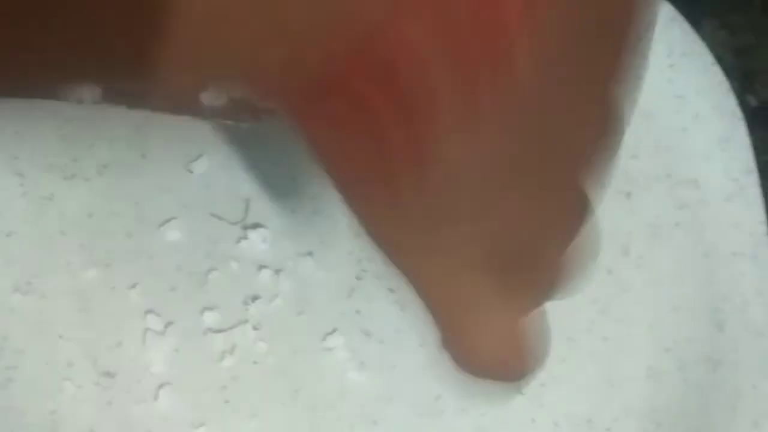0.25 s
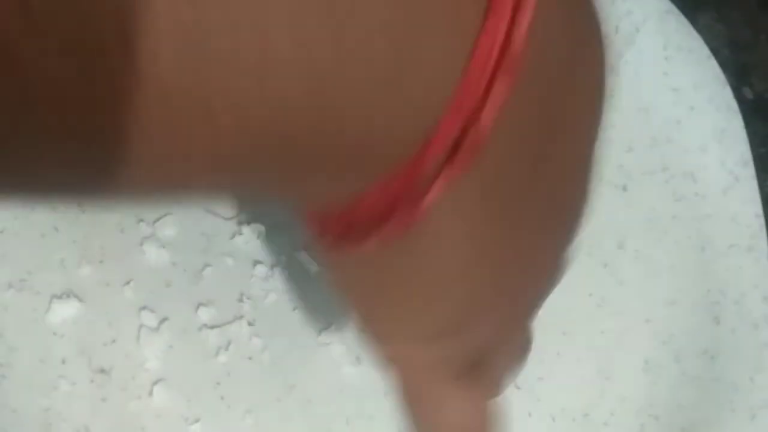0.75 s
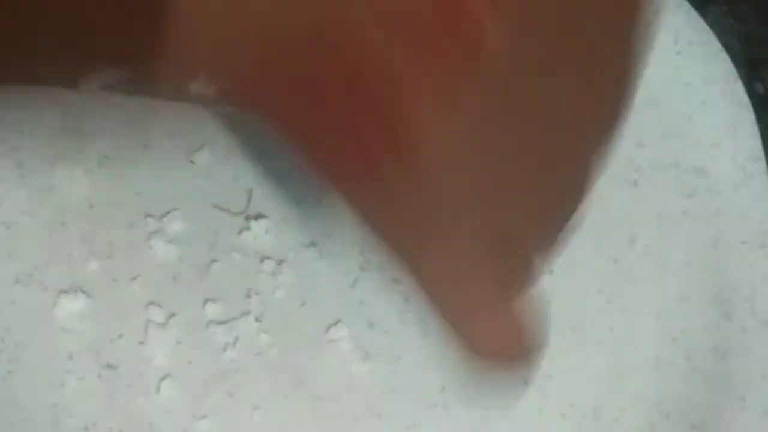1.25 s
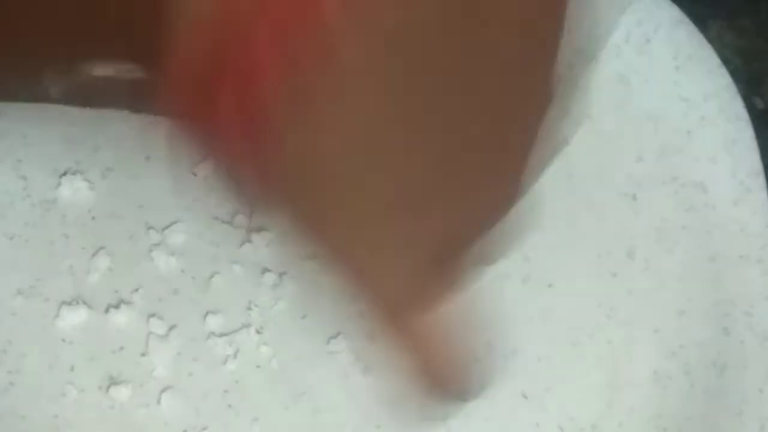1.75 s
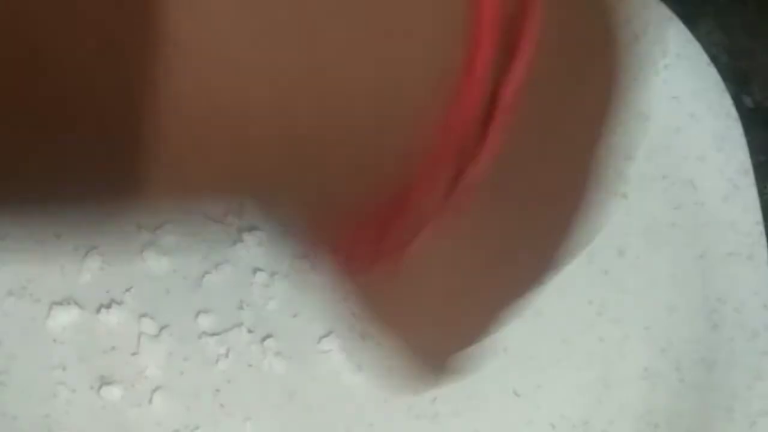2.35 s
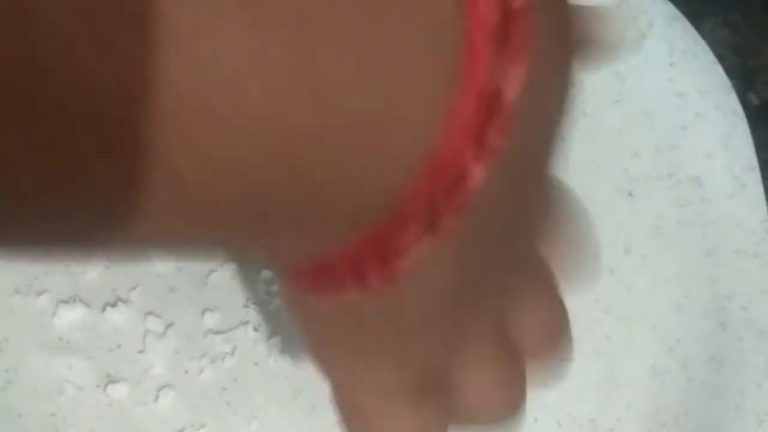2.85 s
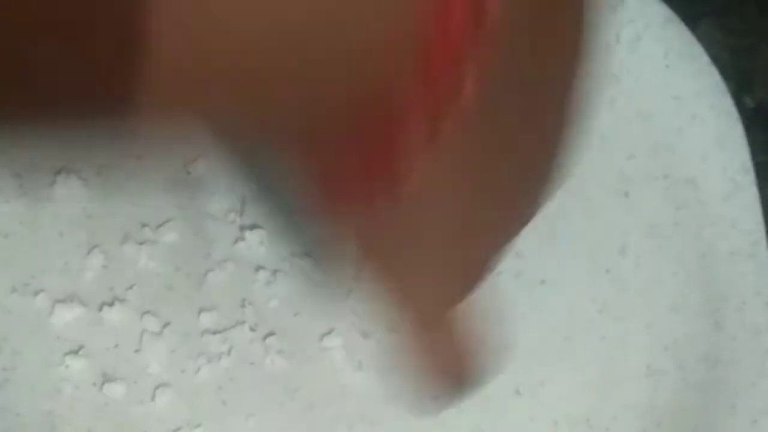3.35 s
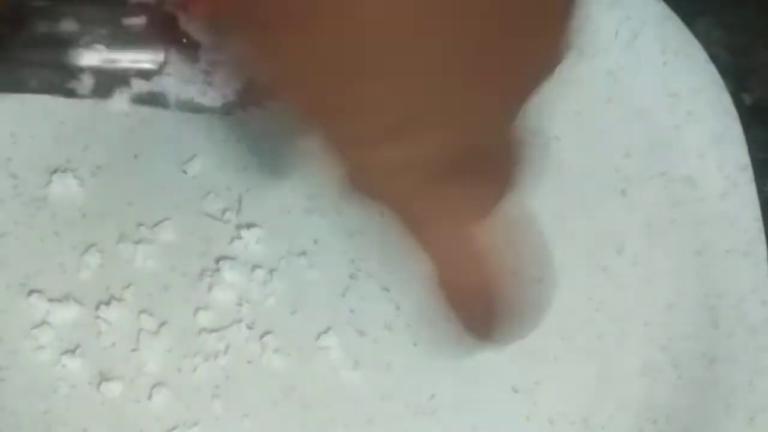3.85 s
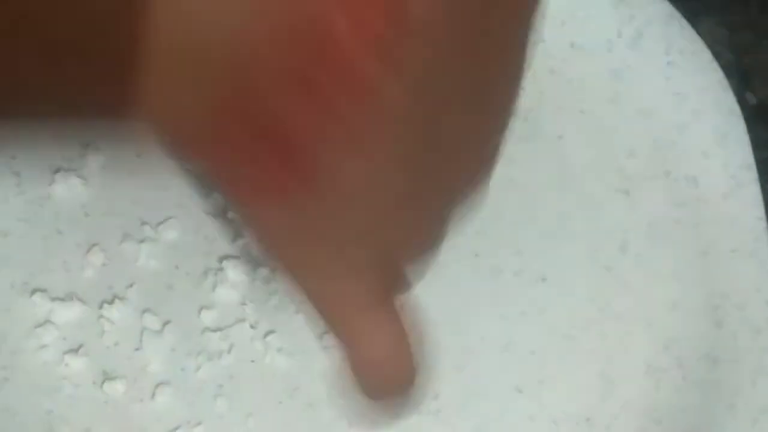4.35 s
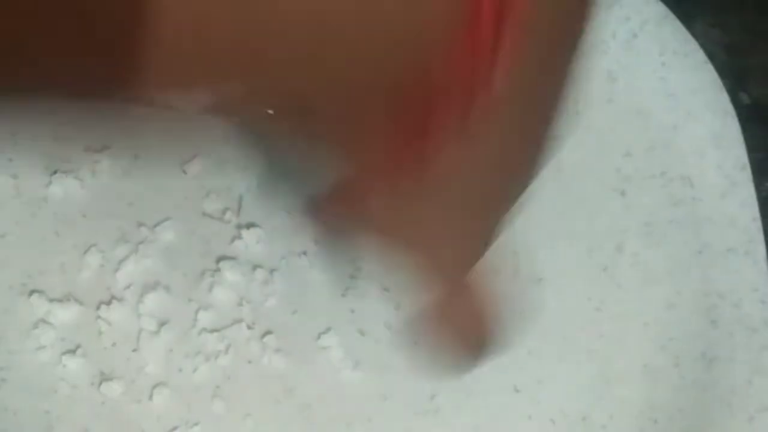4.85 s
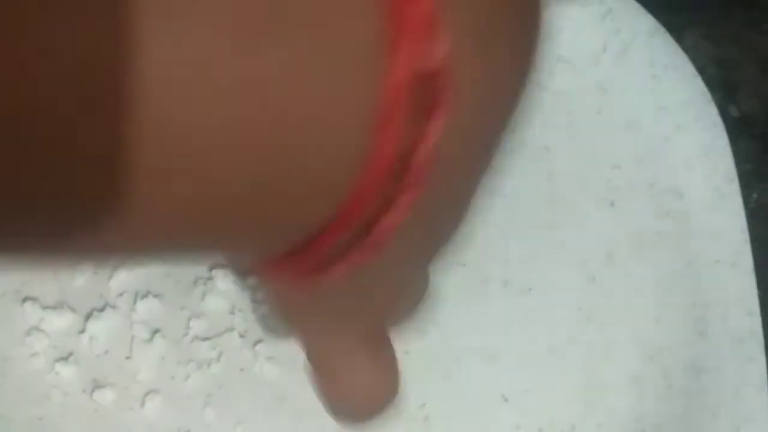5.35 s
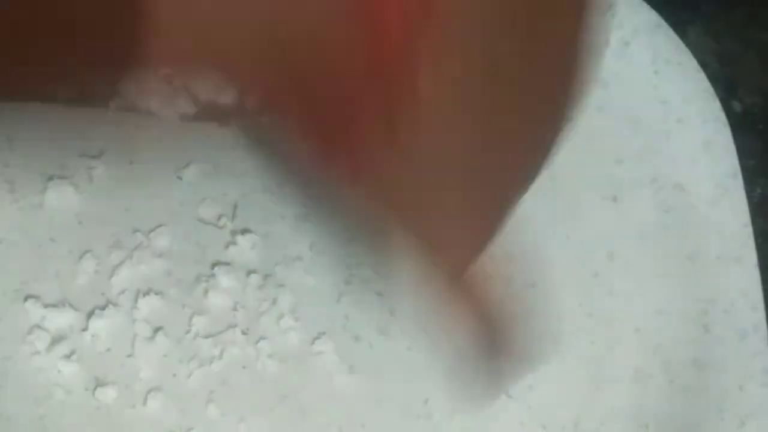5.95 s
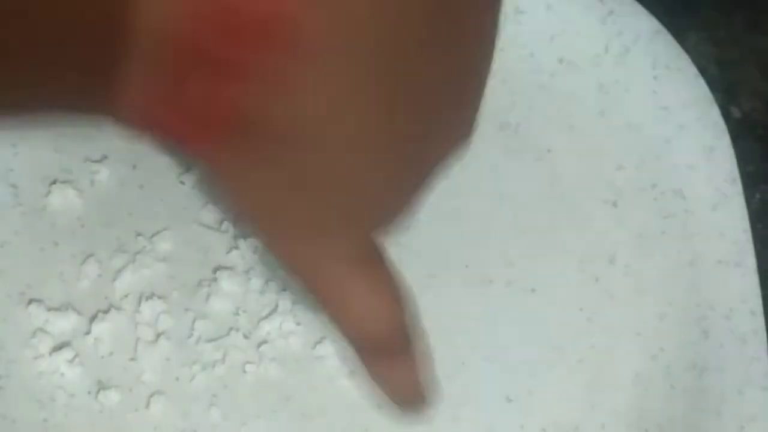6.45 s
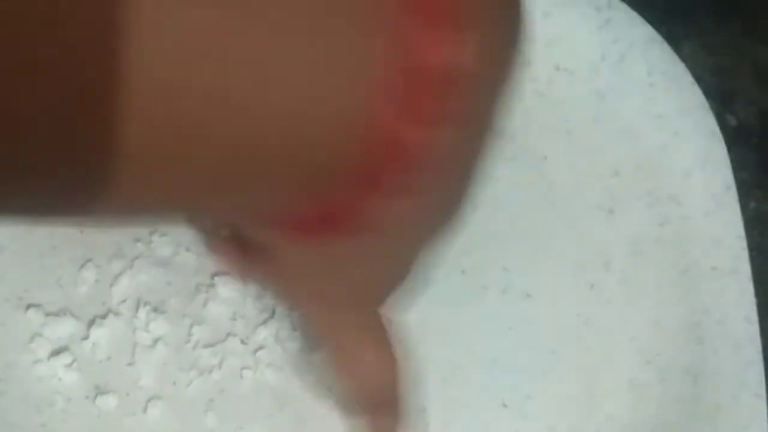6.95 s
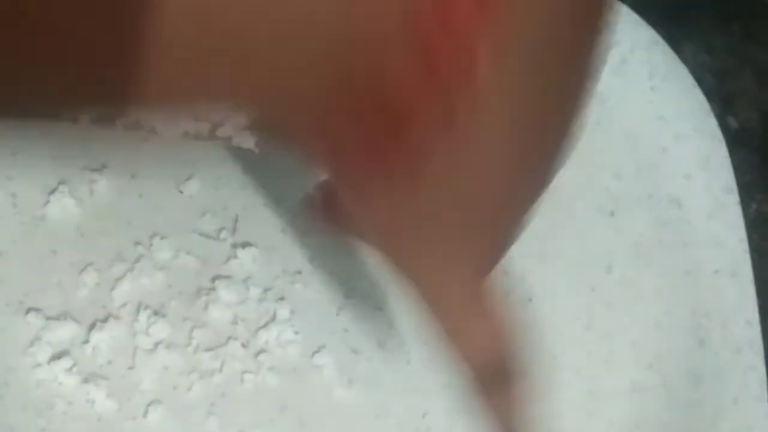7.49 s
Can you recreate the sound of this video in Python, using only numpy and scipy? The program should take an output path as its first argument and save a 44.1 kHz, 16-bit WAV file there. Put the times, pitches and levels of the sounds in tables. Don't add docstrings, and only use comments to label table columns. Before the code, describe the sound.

Rhythmic, uneven scraping of wet coconut flesh by steel teeth. Each stroke bites in several stuttering catches, bright and tearing with a slight metallic ring, while the hollow shell knocks low. Strokes are strongest in the middle, then ease a little, with brief pauses along the way. Faint squeaks and light touches fall between them. Heard up close, slightly overloaded on the hardest bites, in a short dry room.

```python
import sys
import numpy as np
from scipy import signal
from scipy.fft import rfft, irfft
from scipy.io import wavfile
from scipy.ndimage import uniform_filter1d

SR = 44100
rng = np.random.default_rng(int(sys.argv[2]) if len(sys.argv) > 2 else 0)


def wav_record(signal):
    frames = np.transpose(np.atleast_2d(signal))
    bounded = np.clip(frames, -1, 1)
    quanta = np.round(bounded * 32767).astype(np.int16)
    wavfile.write(sys.argv[1], SR, quanta)


def amplitude_ratio(level_db):
    exponent = np.asarray(level_db, float) / 20
    return 10 ** exponent


N = 340452

# (start [s], time to full pressure [s], length [s], rasp [dB], hollow thud [dB])
HAND_STROKES = [(-.15, 0.15, 0.19, -15.5, -12), (0.26, 0.047, 0.17, -14, -11.5),
                (0.923, 0.093, 0.19, -12.5, -13), (1.355, 0.044, 0.15, -11.5, -9.5),
                (1.721, 0.077, 0.15, -11, -11.5), (2.085, 0.049, 0.17, -13, -14),
                (2.457, 0.042, 0.18, -13.5, -13.5), (3.094, 0.14, 0.19, -10.5, -12.5),
                (3.49, 0.13, 0.15, -9, -9.5), (3.862, 0.13, 0.16, -11, -9.5),
                (4.227, 0.12, 0.15, -11.5, -9), (4.59, .11, 0.16, -13.5, -10),
                (4.982, 0.062, 0.15, -11.5, -9), (5.609, 0.14, .22, -15.5, -12.5),
                (6.022, .12, 0.18, -13.5, -12), (6.384, .13, 0.19, -14, -12),
                (6.769, 0.16, 0.2, -15.5, -13.5), (7.159, .13, 0.18, -14.5, -12),
                (7.543, 0.088, 0.38, -15, -15)]
# (start [s], length [s], level [dB], extra sharpness [dB/octave])
BACK_DRAGS = [(0.176, 0.13, -36, 5), (0.62, 0.46, -35.5, -0.5), (1.274, 0.07, -35, -4),
              (1.945, 0.3, -34, 0.5), (2.39, 0.069, -52, -1), (3.773, 0.13, -46, 6), (4.775, 0.2, -29, 4),
              (5.11, 0.27, -32, 0), (6.71, 0.14, -47, 0), (7.117, 0.093, -35, 0.5), (7.474, 0.12, -42, -3)]


def grating():
    rasp_db, thud_db, wall_db, sharp_db = hand()
    bite_hiss, bite_thud, held = bite_shapes(rasp_db)
    chatter_db = 0.49 * drift(39) + 1.13 * drift(73)
    steady_force = amplitude_ratio(rasp_db - 4.5 + chatter_db - 8.9 * held)
    force = np.sqrt(steady_force ** 2 + bite_hiss)
    push = np.sqrt(amplitude_ratio(thud_db - 2.5 + 0.19 * chatter_db) ** 2 + bite_thud)
    rasp = bright_rasp(force, sharp_db)
    wall = shell_wall(amplitude_ratio(wall_db - rasp_db - 1.0) * force)
    return rasp + wall + hollow_thud(push)


def bright_rasp(force, sharp_db):
    # (frequency [Hz], density [dB/Hz])
    tear_spectrum = [(880, -9), (1500, -80), (1990, -5), (2150, -11), (2970, -7), (4150, -3), (5140, 3.5),
                     (5670, -9), (6570, -2.5), (9160, -2.5), (11000, 0.5), (12900, -6.5), (15500, -8)]
    # (frequency [Hz], width [Hz], level [dB])
    blade_modes = [(3430, 160, -4.5), (5170, 180, 5.5), (6150, 870, -13), (7730, 116, 9.5), (9080, 110, 10),
                   (9400, 110, 20.5), (9530, 590, 15), (10200, 56, -17), (10300, 320, -37),
                   (11880, 54, 16.5)]
    tears = [force * grit(per_s=7000, spread_db=2.0) for _ in range(3)]
    bright = [colour(v + 0.49 * resonate(v, blade_modes), tear_spectrum) for v in tears]
    rasp = two_ports(bright[0], (0.3, np.array(bright[1:])), lag_s=0.00038, echo_db=-1.5)
    rasp = shaded(rasp, patchy_db=2.0, sharp_db=sharp_db)
    return rasp * amplitude_ratio([[0.5], [-0.5]])


def shell_wall(force):
    # (frequency [Hz], width [Hz], level [dB])
    wall_modes = [(490, 17, -9), (546.6, 17.6, 2), (653, 9.3, -0.5), (705, 7.7, 2.5), (802.4, 33, -0.5),
                  (855, 60, -9.5), (1208, 250, -10), (1349, 27, -3), (1590, 570, -18.5)]
    walls = [resonate(force * grit(per_s=3000, spread_db=3.5), wall_modes) for _ in range(3)]
    return two_ports(walls[0], (0.25, np.array(walls[1:])), lag_s=0.00025, echo_db=-14.5)


def hollow_thud(push):
    # (frequency [Hz], width [Hz], level [dB])
    hollow_modes = [(133, 21.6, -6), (169.9, 16.9, 1), (206.4, 39.6, -8.5), (267.5, 25.2, -5),
                    (310.8, 27.6, -1.5), (359, 10.8, 1), (405.5, 39.4, -7.5)]
    shove = push * grit(per_s=1500, spread_db=2.5)
    thud = resonate(shove, hollow_modes)
    uneven = 0.12 * push * rng.standard_normal(N) - 0.18 * shove
    askew = resonate(uneven, hollow_modes[3:])
    return thud * amplitude_ratio([[-0.9], [0.9]]) + askew * [[1], [-1]]


def hand():
    # (share of the stroke [1], sharpness [dB/octave])
    sharpness = [(0, 4.5), (.15, 1), (.5, -2), (1.0, -0.5), (1.3, -8.5), (1.6, 3)]
    start, _, length, rasp, thud = np.transpose(HAND_STROKES)
    wall = rasp - 8.5 + 0.51 * (thud - rasp)
    rasp_db = pressure(rasp, lag_s=0, entry_db=-6.5, exit_db=-6.5, release_db_per_s=448,
                       rest_db=-46, drag_db=0)
    thud_db = pressure(thud, lag_s=0.021, entry_db=-10.5, exit_db=-8.5, release_db_per_s=168,
                       rest_db=-40, drag_db=-4)
    wall_db = pressure(wall, lag_s=0.017, entry_db=-4.5, exit_db=-9, release_db_per_s=170,
                       rest_db=-56, drag_db=-22)
    t = np.arange(N) / SR
    stroke = np.searchsorted(start, t) - 1
    share = (t - start[stroke]) / length[stroke]
    sharp_db = np.interp(share, *np.transpose(sharpness))
    for s, span, _, extra in BACK_DRAGS:
        sharp_db += extra * np.sin(np.pi * np.clip((t - s) / span, 0, 1))
    return rasp_db, thud_db, wall_db, sharp_db


def pressure(peaks_db, lag_s, entry_db, exit_db, release_db_per_s, rest_db, drag_db):
    attack_s = 0.018
    t = np.arange(N) / SR
    power = np.full(N, amplitude_ratio(rest_db) ** 2)
    for (s, rise, length, *_), db in zip(HAND_STROKES, peaks_db):
        swell_s = max(rise + lag_s - attack_s, 0.005)
        sag_s = max(length - rise, 0.005)
        knees = s + np.cumsum([0, attack_s, swell_s, sag_s, 60 / release_db_per_s])
        levels_db = [entry_db - 19.5, entry_db, 0, exit_db, exit_db - 65]
        at = slice(max(int(s * SR), 0), int(knees[-1] * SR))
        power[at] += amplitude_ratio(db + np.interp(t[at], knees, levels_db)) ** 2
    for s, length, db, _ in BACK_DRAGS:
        at = slice(int(s * SR), int((s + length) * SR))
        power[at] += (amplitude_ratio(db + drag_db) * np.sin(np.pi * (t[at] - s) / length)) ** 2
    return 10 * np.log10(power)


def bite_shapes(rasp_db, rise_s=0.0015, fade_s=0.0014):
    hiss, thud, held = np.zeros(N), np.zeros(N), np.zeros(N)
    for s, db, thud_db, length in catches(rasp_db):
        s = s + 0.0009
        length = np.clip(length, 0.002, 0.03)
        t = np.arange(min(int((length + 6 * fade_s) * SR), N - int(s * SR))) / SR
        let_go = np.exp(-np.maximum(t - length, 0) / fade_s)
        shape = (1 - np.exp(-t / rise_s)) * np.exp(-40 * t) * let_go
        snap = 1 + 0.5 * np.exp(-t / 0.00062)
        at = slice(int(s * SR), int(s * SR) + len(t))
        hiss[at] += (amplitude_ratio(db - 9.0) * shape * snap) ** 2
        thud[at] += (amplitude_ratio(db + thud_db - 3.5) * shape) ** 2
        hush_start = max(at.start - int(0.008 * SR), 0)
        held[hush_start:at.start] += np.clip((db + 10.5) / 12, 0, 2)
    return hiss, thud, uniform_filter1d(held, size=160)


def catches(rasp_db):
    # (first [s], spacing [s], teeth [count], level above the rasp [dB])
    tooth_runs = [(.2668, .016, 2, 3), (.319, 0.054, 2, 14), (.93, 0.046, 2, -1), (.984, 0.02, 2, 8.5),
                  (1.37, 0.012, 2, 10.5), (1.417, .049, 1, 12.5), (1.466, 0.037, 2, 7),
                  (1.731, 0.033, 2, 11), (1.808, 0.023, 4, 9), (2.091, 0.025, 2, 8), (2.2124, 0.029, 2, 13),
                  (2.603, 0.025, 2, 13.5), (3.09, 0.033, 3, 11.5), (3.232, 0.015, 3, 12),
                  (3.5055, 0.037, 2, 7), (3.8711, 0.026, 3, 8.5), (3.9696, .026, 1, 0),
                  (4.2397, 0.024, 2, 9), (4.598, 0.022, 1, 8.5), (4.99, .024, 2, 2), (5.09, .024, 1, 10),
                  (5.617, 0.017, 3, 12.5), (5.7324, 0.061, 2, 15), (6.0344, 0.0205, 3, 3),
                  (6.393, .03, 1, 7), (6.783, 0.03, 2, -11), (6.9, 0.0148, 3, 11.5), (7.182, .027, 5, 8),
                  (7.5557, 0.017, 2, 4)]
    # (time [s], peak [dB], length [s])
    hard_catches = [(0.348, -4, 0.005), (1.028, -0.5, 0.0061), (1.046, 1.5, 0.0052), (1.441, -3, 0.0047),
                    (2.529, -1, 0.013), (2.567, 3.5, .0058), (3.1727, 4, 0.01), (3.203, 0.5, 0.027),
                    (3.5564, -0.5, 0.015), (4.293, -1.5, 0.013), (4.3154, 1.5, 0.006), (4.62, -3.5, 0.0091),
                    (4.6503, -2, 0.0068), (4.6734, -2.5, 0.022), (5.037, -3.5, 0.0091), (5.067, 2.5, 0.007),
                    (5.6835, -3.5, 0.0095), (5.7108, 0, 0.012)]
    # (time [s], thud [dB])
    shell_jolts = [(.005, -10), (0.321, -5), (.962, -18), (1.087, -12.5), (1.395, -5.5), (1.48, -14),
                   (1.773, -5), (1.884, -9), (2.115, -11), (2.167, -5.5), (2.52, -28), (3.17, 6),
                   (3.25, -2.5), (3.293, -7.5), (3.62, -10), (3.924, -7.5), (4.013, -16), (4.264, -9),
                   (4.365, -22), (4.675, 0), (4.75, -13), (5.014, -7.5), (5.044, -0.5), (5.751, -9),
                   (6.09, -8), (6.16, -24), (6.524, -5), (6.913, -8), (7.288, -6), (7.685, -3)]
    # (time [s], peak [dB], thud against the peak [dB], length [s])
    light_touches = [(.223, -23, -20, .015), (0.507, -31, 0, 0.0076), (0.847, -32, -1, 0.013),
                     (1.23, -21.5, -18, 0.0074), (1.342, -21, -3, 0.014), (1.675, -24, -5, 0.012),
                     (1.713, -23, -15, 0.015), (1.939, -22.5, 4, 0.0067), (2.42, -27, -13, .008),
                     (2.7332, -21.5, -17, 0.015), (2.812, -28, -12, .0067), (2.983, -20, -3, 0.021),
                     (3.423, -20, -4, 0.02), (3.812, -23, -1, 0.01), (4.1873, -16, -3, 0.011),
                     (4.548, -21, -2, 0.011), (4.838, -26, -8, 0.0065), (5.491, -14.5, -3, 0.0052),
                     (5.972, -19, 0, 0.011), (6.351, -25.5, 6.5, 0.016), (6.721, -16, 1, 0.0076),
                     (7.119, -21.5, -2, 0.0081), (7.508, -24.5, 0.5, 0.0097)]
    bite_s, bite_thud_db, bite_spread_db = 0.005, -18.5, -1
    jolt_s, jolt_tear_db = 0.014, -23
    luck = rng.standard_normal((len(tooth_runs), 8))
    found = []
    for i, (first_s, gap_s, teeth, db) in enumerate(tooth_runs):
        for k in range(round(teeth)):
            s = first_s + k * gap_s
            peak_db = rasp_db[int((s + 0.01) * SR)] + db + bite_spread_db * luck[i, k]
            found.append((s, peak_db, bite_thud_db, bite_s))
    found += [(s, db, bite_thud_db, length) for s, db, length in hard_catches]
    found += [(s, db + jolt_tear_db, -jolt_tear_db, jolt_s) for s, db in shell_jolts]
    return found + list(light_touches)


def grit(per_s, spread_db):
    sizes = amplitude_ratio(spread_db * np.minimum(rng.exponential(1, N), 4)) * rng.choice([-1, 1], N)
    return rms_one(sizes * (rng.random(N) < per_s / SR))


def squeaks():
    # (start [s], length [s], first [Hz], last [Hz], roughness [0-1], level [dB])
    slides = [
        (3.761, 0.063, 6100, 6070, 0.01, -41),
        (4.04, 0.087, 6400, 6150, 0, -41.5),
        (5.308, 0.14, 3660, 5290, 0.06, -36.5),
        (5.33, 0.19, 6100, 6180, 0, -43),
        (7.39, 0.23, 6020, 6070, 0.03, -46.5),
    ]
    out, waver, flutter = np.zeros(N), drift(550), drift(210)
    for s, length, first_hz, last_hz, rough, db in slides:
        u = np.linspace(0, 1, int(length * SR))
        at = slice(int(s * SR), int(s * SR) + len(u))
        hz = (first_hz + (last_hz - first_hz) * u ** 0.33) * (1 + rough * waver[at])
        swell = amplitude_ratio(db) * np.sin(np.pi * u) ** 0.17 * flutter[at]
        out[at] += swell * np.sin(2 * np.pi * np.cumsum(hz) / SR)
    return out


def kitchen(x):
    t60_s, level_db = 0.15, -19
    t = np.arange(int(0.4 * SR)) / SR
    tail = rng.standard_normal((2, len(t))) * amplitude_ratio(-60 * t / t60_s) * (t > 0.006)
    tail = signal.lfilter([1], [1, -0.5], tail)
    tail /= np.sqrt(np.sum(tail ** 2, axis=1, keepdims=True))
    return amplitude_ratio(level_db) * signal.fftconvolve(x[None], tail, axes=1)[:, :N]


def room_tone():
    # (frequency [Hz], density [dB/Hz])
    tone_spectrum = [(18, -55), (30, -20), (59, -18), (156, 6), (237, -9.5), (350, -37), (480, -17),
                     (809, -16), (922, -22), (1730, -20), (2360, -22.5), (3230, -19.5), (3880, -21.5),
                     (9960, -24.5), (15500, -29.5)]
    # (frequency [Hz], left-right likeness [-1 to 1])
    likeness = [(60, 1), (240, 0.91), (950, -0.082), (3770, 0.036), (15000, 0.012)]
    hz = np.fft.rfftfreq(N, 1 / SR)
    alike = np.clip(at_hz(likeness, hz), -1, 1)
    mid, side = rfft(rng.standard_normal((2, N))) * amplitude_ratio(at_hz(tone_spectrum, hz))
    both = irfft(np.sqrt(1 + alike) * mid + np.sqrt(1 - alike) * side * [[1], [-1]], N)
    return amplitude_ratio(-31.5 + 1.0 * drift(3.2)) * rms_one(both)


def two_ports(x, own, lag_s, echo_db):
    own_share, own_sound = own
    out, at = [], np.arange(N)
    for first_s in (0, lag_s):
        paths = []
        for late_s in rng.uniform(0.0003966, 0.001999, size=2):
            delay_s = first_s + late_s * (1 + 0.1252 * drift(2.71))
            paths.append(np.interp(at - SR * delay_s, at, x))
        direct = np.interp(at - int(SR * first_s), at, x)
        out.append(direct + amplitude_ratio(echo_db) * (paths[0] - paths[1]))
    return np.sqrt(1 - own_share) * np.array(out) + np.sqrt(own_share) * own_sound


def shaded(x, patchy_db, sharp_db=0, size=128):
    hz, s, frames = signal.stft(x, SR, nperseg=size)
    field = rng.standard_normal(frames.shape[1:])
    for axis, reach in ((0, 3), (0, 3), (1, 22), (1, 22)):
        field = uniform_filter1d(field, reach, axis=axis)
    slope_db = np.interp(s, np.arange(N) / SR, sharp_db + np.zeros(N))
    tilt_db = slope_db * np.log2((hz[:, None] + 500) / 7000)
    gain = amplitude_ratio(patchy_db * rms_one(field) * (hz[:, None] > 1200) + tilt_db)
    return signal.istft(frames * gain, SR, nperseg=size)[1][:, :N]


def resonate(x, modes):
    def bank(v):
        out = 0
        for k, (hz, width_hz, db) in enumerate(modes):
            r = np.exp(-np.pi * max(width_hz, 5) / SR)
            poles = [1, -2 * r * np.cos(2 * np.pi * hz / SR), r * r]
            out = out + (-1) ** k * amplitude_ratio(db) * signal.lfilter([1 - r * r, 0, r * r - 1], poles, v)
        return out
    return bank(x) / np.sqrt(np.sum(bank(signal.unit_impulse(SR // 2) + 1e-18) ** 2))


def colour(x, spectrum, size=4096):
    cepstrum = irfft(np.log(amplitude_ratio(at_hz(spectrum, np.fft.rfftfreq(size, 1 / SR)))))
    cepstrum[1:size // 2] *= 2
    cepstrum[size // 2 + 1:] = 0
    taps = irfft(np.exp(rfft(cepstrum)))
    return signal.fftconvolve(x, taps / np.sqrt(np.sum(taps ** 2)))[:N]


def drift(rate_hz):
    r = np.exp(-16 * np.pi * rate_hz / SR)
    slow = signal.lfilter([1], [1, -2 * r, r * r], rng.standard_normal(N // 8 + 4001))[4000:]
    return np.interp(np.arange(N) / 8, np.arange(len(slow)), rms_one(slow))


def at_hz(points, hz):
    points_hz, values = np.transpose(points)
    return np.interp(np.log(hz + 1), np.log(points_hz + 1), values)


def rms_one(x):
    return x / np.sqrt(np.mean(x ** 2) + 1e-20)


def scene():
    near, squeak = grating(), squeaks()
    tail = kitchen(near.mean(axis=0) + 9.1 * squeak)
    return near + tail + squeak * amplitude_ratio([[1.5], [-1.5]]) + shaded(room_tone(), patchy_db=2.0)


def band_limit(x):
    return signal.sosfilt(signal.butter(12, 15680, fs=SR, output="sos"), x)


def record(dry):
    loaded = 1.134 * np.tanh(dry / 1.348)
    bass_cut = signal.butter(2, 32, "high", fs=SR, output="sos")
    mix = np.clip(signal.sosfilt(bass_cut, loaded), -0.97, 0.97)
    return band_limit(mix)


dry = scene()
out = record(dry)
wav_record(out)
```